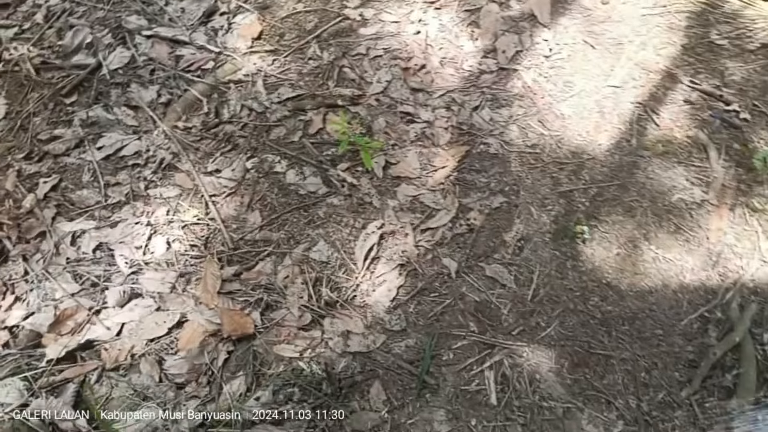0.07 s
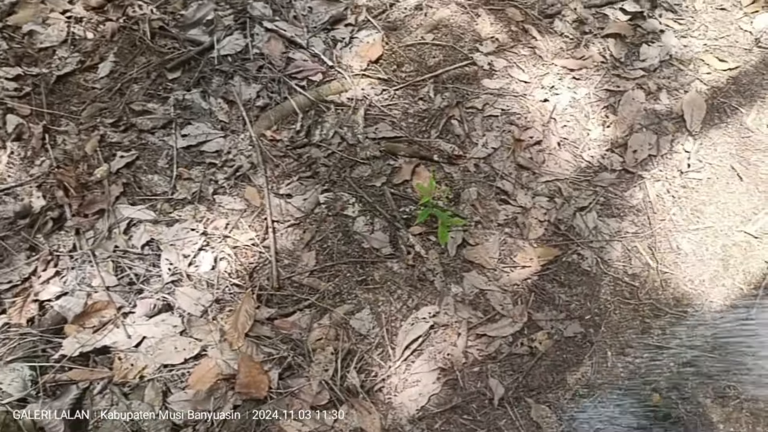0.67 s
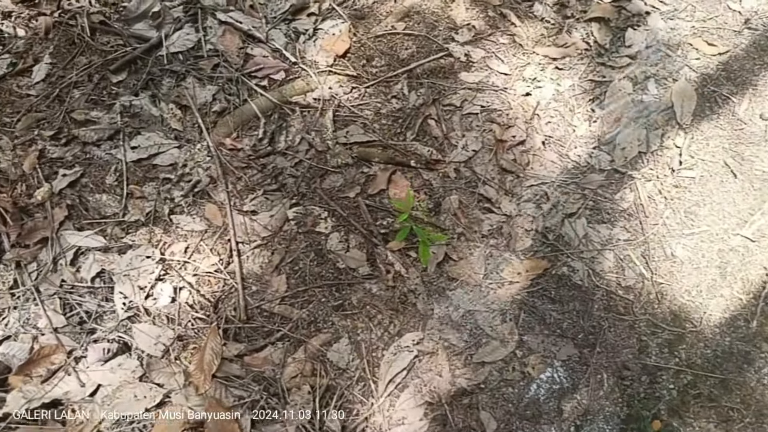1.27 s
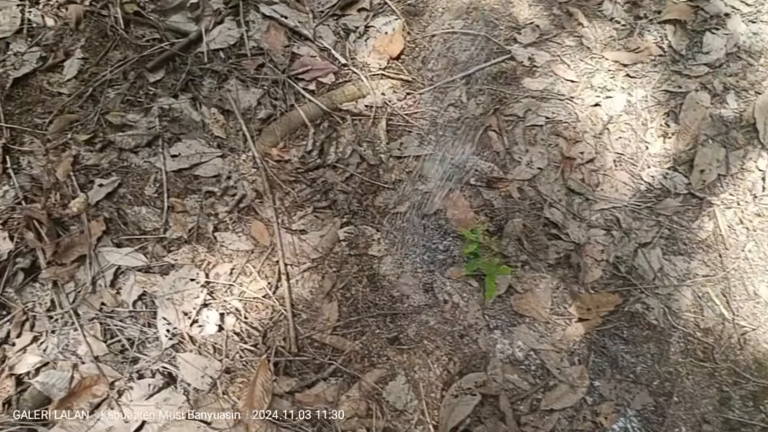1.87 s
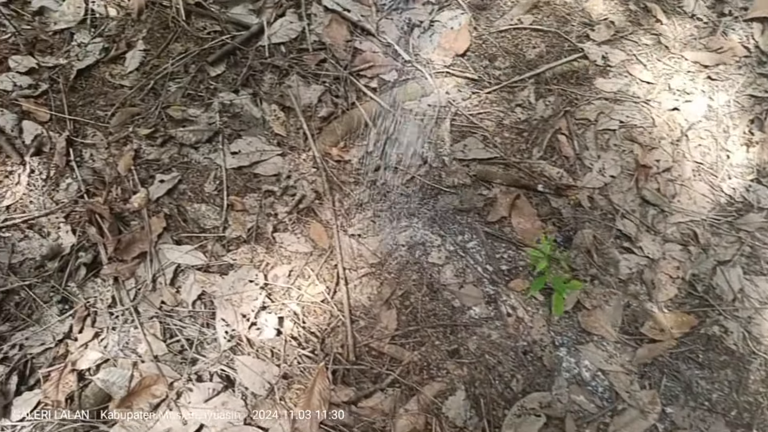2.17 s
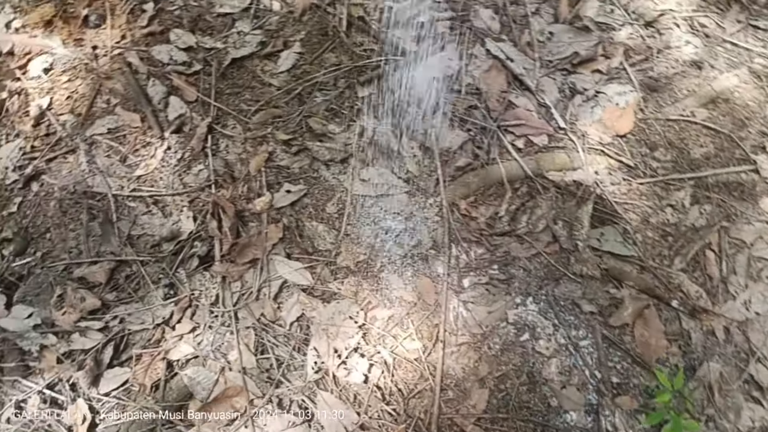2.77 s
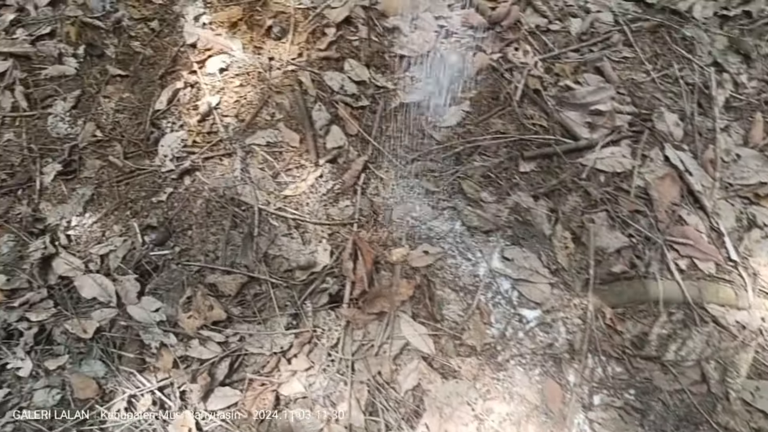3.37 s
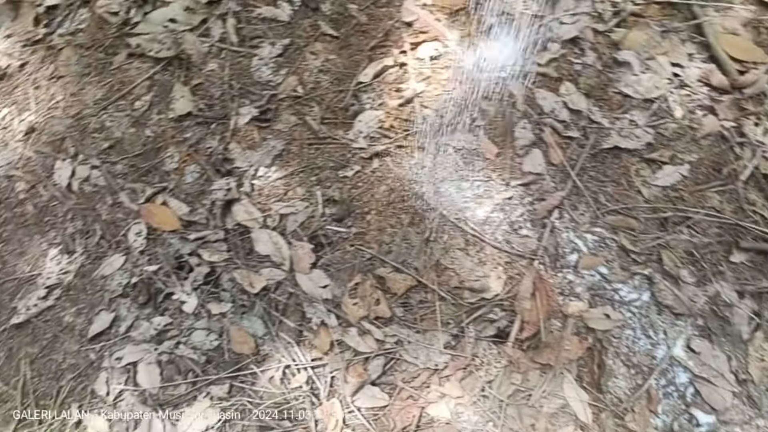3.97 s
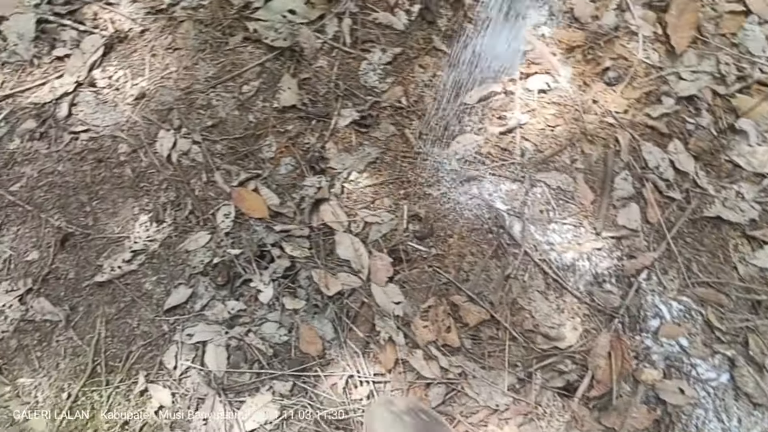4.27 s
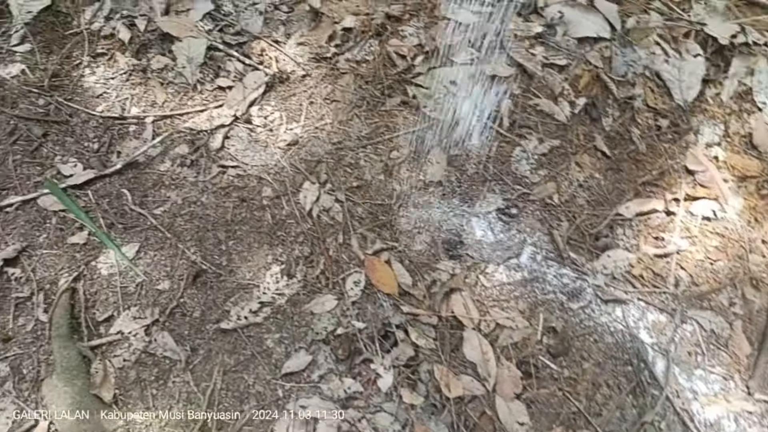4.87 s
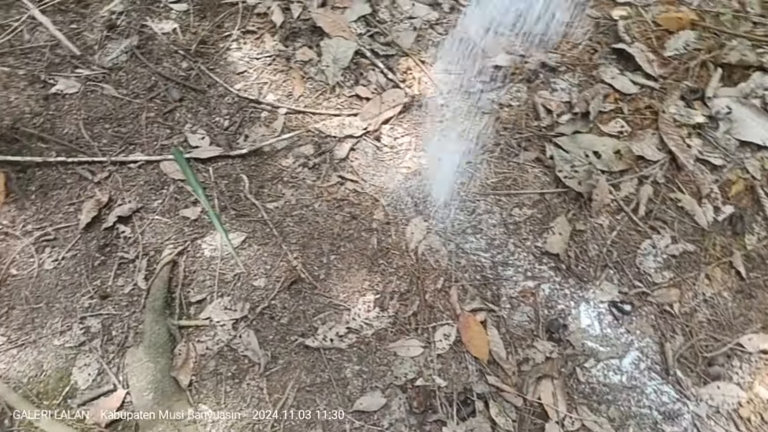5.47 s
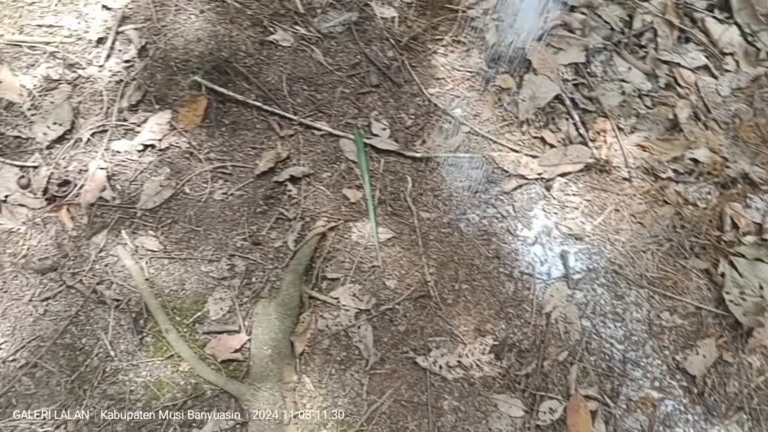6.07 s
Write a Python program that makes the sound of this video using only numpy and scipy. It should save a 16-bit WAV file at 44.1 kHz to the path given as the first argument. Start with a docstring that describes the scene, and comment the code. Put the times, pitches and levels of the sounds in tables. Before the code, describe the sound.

Fertiliser granules pour onto dry leaf litter, making a dense, crisp patter of tiny ticks. It starts with a brief stutter and a thin trickle, then swells in uneven handfuls, eases, and surges once more near the end. Soft, dull footsteps and a few twig knocks lie underneath. The sound is close and dry in faint open air, and a hand bumps the microphone about a second in.

```python
"""Fertiliser granules on dry leaves

Someone walks with a hand-held microphone, pouring a trail of granules over dry leaf litter.
After a stutter of the bag or scoop, thousands a second tick on leaves and soil: a trickle, handfuls,
clumps and lone heavy granules. Soft steps and the pour thud dully on the ground, and twigs knock.
Now and then the hand bumps the left microphone port; faint air and handling rumble lie underneath."""
import sys
import numpy as np
from scipy import signal
from scipy.fft import rfft, irfft
from scipy.io import wavfile
from scipy.ndimage import map_coordinates

SR = 44100
rng = np.random.default_rng(int(sys.argv[2]) if len(sys.argv) > 2 else 0)


def log_audio(samples):
    """Write samples as a 16-bit WAV file to the path given in sys.argv[1]."""
    # one column per channel
    frames = np.atleast_2d(samples).T
    # limit to full scale, then quantise
    limited = np.clip(frames, -1, 1)
    pcm = np.round(limited * 32767).astype(np.int16)
    wavfile.write(sys.argv[1], SR, pcm)


N = 274302

# The thin trickle between handfuls: (time [s], level [dB], crispness [dB])
TRICKLE = [(0, -84, -18), (.115, -72, -10), (.135, -42, 7), (.46, -45, 1), (.55, -49.5, 2), (.74, -48, 0.5),
           (.87, -43, -1), (.9, -36, 7), (1.08, -31.5, -3.5), (1.45, -32, -1), (1.59, -41, -2),
           (1.7, -32.5, 1), (2.1, -32.5, 2.5), (3.55, -36, 0), (4.45, -40, -2), (4.8, -37, 2),
           (5.3, -40.5, 1), (6.22, -41, 1)]
# Handfuls let go in a steady stream: (full flow at [s], hold [s], level [dB], rise [s], crispness [dB])
HANDFULS = [(0.135, 0.083, -37.5, 0.0018, -2), (1.099, 0.16, -32, .025, -4),
            (1.719, 0.12, -32.5, 0.0033, 4), (1.817, 0.15, -26.5, 0.027, 1),
            (2.096, 0.036, -29.5, 0.0067, 7), (2.166, 0.25, -29.5, 0.0047, -5.5),
            (2.477, 0.15, -33.5, 0.014, -8), (2.736, 0.082, -27, 0.0077, -1.5),
            (2.834, .1, -23.5, 0.034, 1), (3, 0.27, -31, .02, -8.5), (3.38, 0.14, -25.5, 0.09, 2),
            (3.655, 0.15, -33, .005, -6), (4.067, 0.076, -32.5, 0.03, -1), (4.335, 0.083, -36, .006, 0.5),
            (4.898, 0.09, -29, 0.062, 10), (5.21, 0.11, -41.5, .008, 12), (5.945, 0.097, -33, 0.023, -2)]
# Clumps, each striking one leaf: (peak time [s], level [dB], rise [s], fall [s], leaf pitch [Hz])
CLUMPS = [(.104, -47, 0.0015, 0.0021, 5370), (0.197, -27.5, 0.016, 0.0093, 4500),
          (.35, -34, 0.021, 0.015, 5170), (.511, -39.5, 0.011, 0.0075, 4900), (.82, -38, 0.014, .012, 4800),
          (1.15, -20, 0.013, 0.011, 2790), (1.305, -21.5, 0.0093, 0.011, 2970),
          (1.471, -26.5, 0.0065, 0.0042, 3560), (1.717, -25, .0012, 0.0054, 3900),
          (1.781, -20.5, .0015, 0.018, 4250), (1.911, -23.5, 0.0053, 0.017, 4250),
          (2.26, -24.5, 0.0085, 0.013, 3540), (2.417, -21.5, 0.012, .017, 3040),
          (2.564, -24.5, 0.015, 0.0098, 2830), (2.877, -20.5, 0.017, 0.006, 3700),
          (3.034, -18.5, 0.0096, 0.016, 3250), (3.332, -23.5, 0.012, 0.013, 2680),
          (3.635, -25.5, 0.0066, 0.02, 3230), (3.785, -22, 0.017, 0.01, 3020),
          (3.938, -30, 0.014, 0.033, 3720), (4.221, -31, 0.014, 0.016, 3020),
          (4.525, -33, 0.012, 0.031, 3800), (5.109, -31.5, 0.0028, 0.013, 3950),
          (5.527, -18.5, 0.0057, 0.013, 3930), (5.55, -21, 0.015, 0.034, 4420),
          (5.663, -18, 0.0049, 0.031, 4320), (5.792, -27, 0.0069, 0.023, 3020),
          (6.094, -32, 0.014, 0.016, 3340)]
# Where the stream lands in the stereo image: (time [s], lag of the left ear [samples])
LANDING_LAG = [(0, 8), (.5, 9), (.8, 5.5), (1.2, 4), (1.7, 1.16), (2.4, 0.5), (3.3, -0.5), (4.2, 3.5),
               (6.2, 1.16)]
# Hollow, body, crisp and fizz bands. Crisp litter favours the highs, limp litter the lows, and a heavy
# stream buries the fizz: (offset [dB], slope with crispness [dB/dB], slope with stream level [dB/dB])
PATTER_BANDS = [(-13.5, -0.61, 0.8148), (-3.5, -.5, 1.01), (-3, 0.25, 1), (-8.5, 0, 0.71)]
# EQ of the patter in each ear: (frequency [Hz], gain [dB])
LEFT_EQ = [(150, -22.5), (400, -17), (800, -11), (1400, -8), (2000, -2.5), (3400, 3.5), (5200, 1),
           (6500, -5), (8000, -16), (9400, -21.5), (10400, -24.5), (12000, -22), (14500, -21.5),
           (16000, -20)]
RIGHT_EQ = [(150, -21.5), (400, -14.5), (800, -9), (1400, -8.5), (2000, -2), (3400, 1.5), (5200, -1.5),
            (6800, -8), (8200, -5), (9800, -15), (12000, -18.5), (13800, -17.5), (15400, -9),
            (16000, -35.5)]
# Sharp ticks, an opening stutter of the bag or scoop, then lone heavy granules: (time [s], level [dB])
SHARP_TICKS = [(0.126, -30), (0.13, -24), (0.1354, -31), (0.144, -22), (0.1512, -36), (0.158, -39),
               (0.1644, -35), (0.8919, -30), (3.1332, -14.5), (4.653, -32), (5.0674, -21.5), (5.3338, -16),
               (5.3496, -20.5), (5.422, -19)]
# Dull, low crunches of footsteps and of the pour thudding on the soil:
# (peak time [s], level [dB], rise [s], fall [s], pitch [Hz])
LOW_CRUNCHES = [(0.36, -48, 0.0036, 0.015, 370), (.405, -42, 0.015, 0.026, 148),
                (0.425, -35.5, 0.0034, 0.004, 354), (.985, -47, 0.088, 0.061, 396),
                (2.26, -51, 0.055, 0.028, 191), (3.335, -42, 0.01, 0.027, 890),
                (3.37, -46.5, 0.033, 0.053, 310), (4.08, -33, 0.0037, 0.02, 1050),
                (4.125, -40, 0.057, 0.043, 367), (4.218, -38.5, 0.011, 0.04, 790),
                (4.54, -51.5, 0.021, 0.16, 485), (5.082, -43, 0.011, 0.018, 1100),
                (5.3, -60.5, 0.13, .06, 310), (5.75, -52.5, 0.038, 0.066, 307),
                (6.04, -50, 0.035, 0.022, 318), (6.095, -53, .008, 0.022, 910)]
# Twigs knocking underfoot: (time [s], peak level [dB], pitch [Hz], bandwidth [Hz])
TWIG_KNOCKS = [(0.4163, -31, 600, 500), (1.2512, -28.5, 800, 700), (4.0746, -25, 895, 600),
               (4.606, -29, 497, 173), (4.65, -44, 504, 200)]
# Hand bumps on the left port: (time [s], level [dB], contact [s], direction [+1 press, -1 release])
PORT_BUMPS = [(0.789, -30.5, 0.00046, -1), (0.9242, -19.5, 0.00066, -1), (0.9542, -3.5, 0.00053, 1),
              (0.9586, -7.5, 0.00071, -1), (1.955, -28.5, 0.00089, -1), (4.833, -34, 0.00086, -1),
              (5.1187, -21, 0.00065, 1)]
# EQ of the outdoor air: (frequency [Hz], gain [dB])
AIR_EQ = [(20, -7), (45, -17), (75, -24), (110, 9.5), (180, -2.5), (400, -3), (1000, -25), (2000, -22),
          (4000, 2), (8000, -40), (16000, -33)]


def granules(dense_per_s=6500, dense_db=-24, crowding=.35, ordinary_db=-29.5, trim_db=-2):
    """The lead layer: a stronger stream patters louder and denser; flow and litter set its tone."""
    level_db, crisp_db = stream()
    lag, = in_time(LANDING_LAG)
    per_s = dense_per_s * from_db(crowding * (level_db - dense_db))
    clicks = impacts(per_s, spread_db=8, limit_sigma=1.69)
    clicks *= flutter(per_s=60, depth_db=2.3)  # granules leave the hand in little clusters
    ticks = leaf_ticks(clicks, lag)
    hum = from_db(-4.5) * leaf_hum(lag)
    fizz = from_db(-4) * skitter(clicks, decay_s=0.011)
    patter = in_ears(ticks + hum + fizz)
    bands_db = [ordinary_db + offset + tilt * crisp_db + growth * (level_db - ordinary_db)
                for offset, tilt, growth in PATTER_BANDS]
    return from_db(trim_db) * ride_bands(patter, bands_db) + struck_leaves(clicks)


def stream(handful_fall_s=0.028, neutral_leaf_hz=3500, crisp_db_per_octave=14):
    """Level and crispness of the pour, in dB: its flows add in power, the strongest leads the tone."""
    trickle_db, trickle_crisp_db = in_time(TRICKLE)
    flows = [(from_db(trickle_db), trickle_crisp_db)]
    for s, hold, db, rise, crisp_db in HANDFULS:
        flows.append((from_db(db) * swell(s, rise, handful_fall_s, hold), crisp_db))
    for s, db, rise, fall, hz in CLUMPS:
        envelope = swell(s, rise, fall, roundness=0.32)  # a clump arrives spread out
        crisp_db = crisp_db_per_octave * np.log2(hz / neutral_leaf_hz)
        flows.append((from_db(db) * envelope, crisp_db))
    power = sum(gain ** 2 for gain, _ in flows)
    return 10 * np.log10(power), sum(gain ** 2 * crisp_db for gain, crisp_db in flows) / power


def leaf_ticks(clicks, lag, scatter_samples=1.2, ring_db=5, q=7.3, pan_db=2, leaves=24):
    """Each granule ticks on one limp, well-damped leaf, with a lag and a pan of its own."""
    right_at = np.flatnonzero(clicks)
    leaf = rng.integers(0, leaves, N)[right_at]
    delay = np.round(lag + scatter_samples * rng.standard_normal(N)).astype(int)
    left_at = np.clip(right_at + delay[right_at], 0, N - 1)
    pan = pan_db * rng.uniform(-1.26, 1.82, N)[right_at]
    left, right = clicks[right_at] * from_db([pan, -pan])
    out = np.zeros((2, N))
    for k, hz in enumerate(np.geomspace(1000, 15000, leaves)):
        on_leaf = leaf == k
        hits = np.array([np.bincount(left_at[on_leaf], left[on_leaf], N),
                         np.bincount(right_at[on_leaf], right[on_leaf], N)])
        out += hits + from_db(ring_db) * resonate(hits, hz, hz / q)
    return out / rms(out)


def leaf_hum(lag, width_at_3khz=49, patchy_db=10, patches=56, modes=40):
    """Countless fine granules keep stiff leaves humming; the stream moves on from patch to patch."""
    hop = N // patches + 1
    crossfade = np.sin(np.pi * np.arange(2 * hop) / (2 * hop))
    hum = np.zeros((patches + 2) * hop)
    for start in range(0, (patches + 1) * hop, hop):
        fines = rng.standard_normal((3, 2 * hop))
        pitches = np.geomspace(1100, 15000, modes) * rng.uniform(.96, 1.04, modes)
        widths = width_at_3khz * pitches / 3000  # high modes are damped more strongly
        exposure = from_db(patchy_db * rng.uniform(-2, 1, modes))
        patch = sum(exposure[k] * resonate(fines[k % 3], pitches[k], widths[k]) for k in range(modes))
        hum[start:start + 2 * hop] += crossfade * patch / rms(patch)
    right = hum[hop:hop + N]
    left = map_coordinates(right, [np.arange(N) - lag], order=3)
    return np.array([left, right]) / rms(right)


def skitter(clicks, decay_s, low_hz=1300):
    """A wide, dying fizz after each click, as of a granule skittering down through the litter."""
    pole = np.exp(-1 / (decay_s * SR))
    envelope = np.sqrt(signal.lfilter([1 - pole], [1, -pole], clicks ** 2 + 1e-18))
    return low_cut(envelope * rng.standard_normal((2, N)), low_hz, order=1)


def struck_leaves(clicks, ring_db=-8, width_hz=130):
    """A clump drums on one leaf and keeps it ringing, a little left of centre."""
    out = np.zeros(N)
    for s, db, rise, fall, hz in CLUMPS:
        ring = resonate(clicks, hz, width_hz)
        out += from_db(db + ring_db) * swell(s, rise, fall) * ring / rms(ring)
    return out * balance(1, -2)


def sharp_ticks(trim_db=1, hz=4600, width_hz=3000, skitter_db=-3):
    """The bag or scoop stutters, then lone heavy granules land: single ticks with little top."""
    clicks = np.zeros(N)
    for s, db in SHARP_TICKS:
        clicks[round(s * SR)] = from_db(db)
    fizz = from_db(skitter_db) * skitter(clicks, decay_s=0.0012)
    ticks = in_ears(resonate(clicks + fizz, hz, width_hz))
    return from_db(trim_db) * ticks * clicks.max() / np.abs(ticks).max()


def low_crunches(band_ratio=1.96):
    """Footsteps press the litter and the pour thuds on the soil: a dull, dense crackle."""
    crackle = impacts(per_s=3000, spread_db=5)
    out = np.zeros(N)
    for s, db, rise, fall, hz in LOW_CRUNCHES:
        crunch = band(crackle, hz / band_ratio, hz * band_ratio)
        out += from_db(db) * swell(s, rise, fall) * crunch / rms(crunch)
    return out


def twigs():
    """A twig pressed against the ground gives a short, hollow knock."""
    out = np.zeros(N)
    for s, db, hz, width_hz in TWIG_KNOCKS:
        click = signal.unit_impulse(N, round(s * SR))
        knock = resonate(resonate(click, hz, width_hz), hz, width_hz)
        out += from_db(db) * knock / np.abs(knock).max()
    return out


def port_bumps(case_hz=98, case_width_hz=66, case_db=16.5, cut_hz=31, leak_db=-42):
    """A touch pushes and pulls the air in the left port, and the case answers with a short, low thud."""
    t = np.arange(N) / SR
    out = np.zeros(N)
    for s, db, contact_s, direction in PORT_BUMPS:
        progress = np.clip((t - s) / contact_s, -10, 10)
        push = direction * progress * np.exp(-progress ** 2 / 2)
        thud = push + from_db(case_db) * resonate(push, case_hz, case_width_hz)
        out += from_db(db) * thud / np.abs(thud).max()
    return low_cut(out, cut_hz, order=2) * balance(0, leak_db)


def handling_rumble():
    """The holding hand makes a faint, uneven rumble, mostly on the left port."""
    rumble = band(rng.standard_normal((2, N)), 60, 90) * flutter(per_s=15, depth_db=3)
    return rumble / rms(rumble) * balance(-58.5, -74.5)


def outdoor_air():
    """The bed: a faint, steady wash of open air."""
    air = np.array([equalise(noise, AIR_EQ) for noise in rng.standard_normal((2, N))])
    return air / rms(air) * balance(-59.5, -63.5)


def from_db(db):
    """Decibels to gain."""
    return 10 ** (np.asarray(db) / 20)


def balance(left_db, right_db):
    """A fader for each ear."""
    return from_db([[left_db], [right_db]])


def rms(x):
    """Root mean square."""
    return np.sqrt(np.mean(x ** 2) + 1e-20)


def in_time(rows):
    """Each column of an automation curve, at every sample."""
    times, *columns = np.transpose(rows)
    return [np.interp(np.arange(N) / SR, times, column) for column in columns]


def swell(peak_s, rise, fall, hold=0, roundness=0):
    """Envelope: exponential rise to 1, hold, exponential fall; the crest may be rounded."""
    t = np.arange(N) / SR - peak_s
    away = np.clip(np.maximum(-t / rise, (t - hold) / fall), 0, 40)
    return np.exp(roundness - np.sqrt(away ** 2 + roundness ** 2))


def flutter(per_s, depth_db):
    """A gain that wanders at random, with a spread near depth_db."""
    knots = rng.standard_normal(400)
    position = np.arange(N) / SR * per_s + rng.random()
    return from_db(depth_db * 1.2 * np.interp(position, np.arange(len(knots)), knots))


def impacts(per_s, spread_db, limit_sigma=3.44):
    """Random clicks of steady mean power: many small ones, a few large."""
    lands = rng.random(N) < per_s / SR
    sizes = from_db(spread_db * np.minimum(rng.standard_normal(N), limit_sigma))
    clicks = lands * sizes * rng.choice([-1, 1], N) / np.sqrt(per_s)
    return clicks / rms(clicks)


def band(x, low_hz, high_hz):
    """Causal band-pass."""
    return signal.sosfilt(signal.butter(2, [low_hz, high_hz], "band", fs=SR, output="sos"), x + 1e-18)


def low_cut(x, hz, order):
    """Causal high-pass."""
    return signal.sosfilt(signal.butter(order, hz, "high", fs=SR, output="sos"), x)


def resonate(x, hz, width_hz):
    """One resonance with gain 1 at its peak."""
    radius = np.exp(-np.pi * width_hz / SR)
    feedback = [1, -2 * radius * np.cos(2 * np.pi * hz / SR), radius ** 2]
    return signal.lfilter(np.array([1, 0, -1]) * (1 - radius ** 2) / 2, feedback, x + 1e-18)


def equalise(x, curve, size=4096):
    """Minimum-phase EQ, so that ticks keep their sharp attack."""
    hz, db = np.transpose(curve)
    grid_hz = np.maximum(np.arange(size // 2 + 1) * SR / size, 1)
    gain = from_db(np.interp(np.log(grid_hz), np.log(hz), db))
    cepstrum = irfft(np.log(gain))
    cepstrum[1:size // 2] *= 2
    cepstrum[size // 2 + 1:] = 0
    return signal.fftconvolve(x, irfft(np.exp(rfft(cepstrum))))[:N]


def in_ears(pair):
    """Each port colours the sound in its own way."""
    return np.array([equalise(pair[0], LEFT_EQ), equalise(pair[1], RIGHT_EQ)])


def ride_bands(x, levels_db, crossovers_hz=(2000, 4000, 7000)):
    """Hollow, body, crisp and fizz bands each ride their own fader, over smooth crossovers."""
    hz = np.arange(N // 2 + 1) * SR / N
    below = [1 / (1 + (hz / edge) ** 12) for edge in crossovers_hz]
    shares = np.diff(below, axis=0, prepend=0, append=1)
    parts = [irfft(rfft(x) * share, N) for share in shares]
    return sum(from_db(db) * part / rms(part.mean(0)) for db, part in zip(levels_db, parts))


def scene():
    """The mix: everything close and dry, in the open air."""
    return (granules() + sharp_ticks() + low_crunches() + twigs() + port_bumps()
            + outdoor_air() + handling_rumble())


def record(dry):
    """A steep high cut on the master."""
    cutoff_hz = 15700
    return signal.sosfilt(signal.ellip(12, .1, 90, cutoff_hz, fs=SR, output="sos"), dry)


dry = scene()
out = record(dry)
log_audio(out)
```